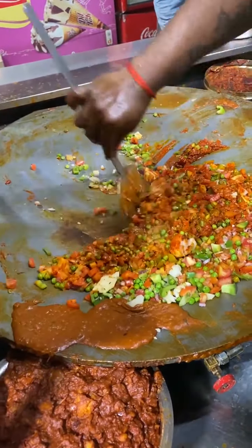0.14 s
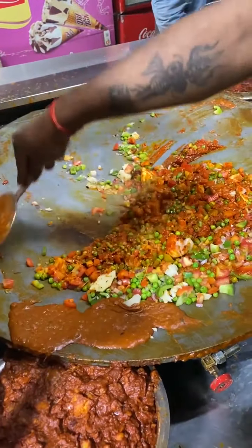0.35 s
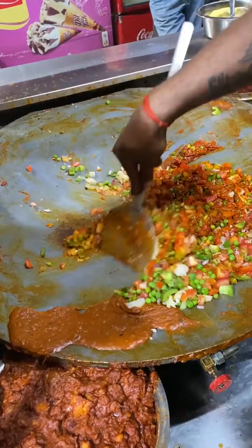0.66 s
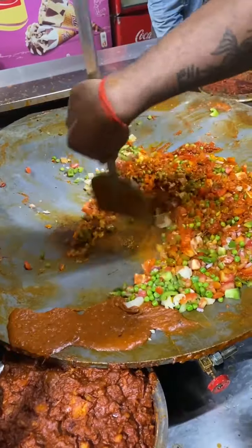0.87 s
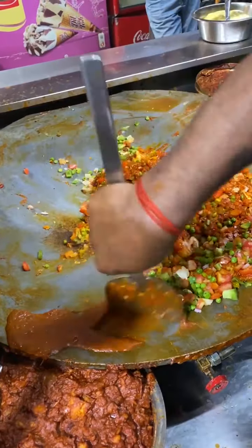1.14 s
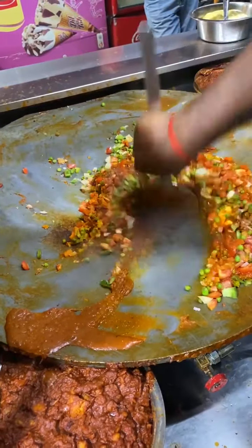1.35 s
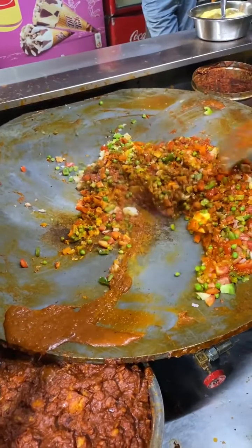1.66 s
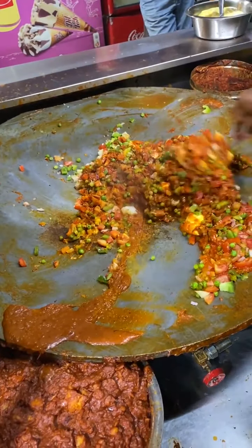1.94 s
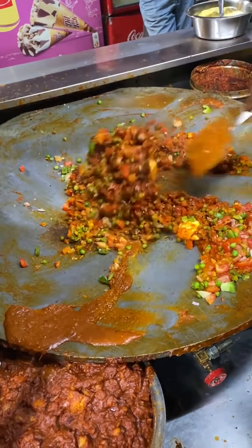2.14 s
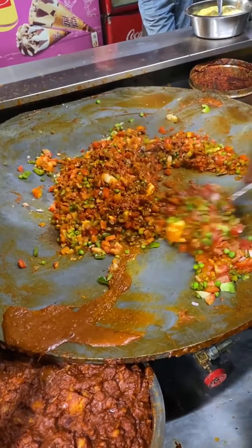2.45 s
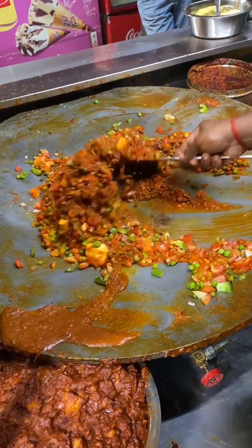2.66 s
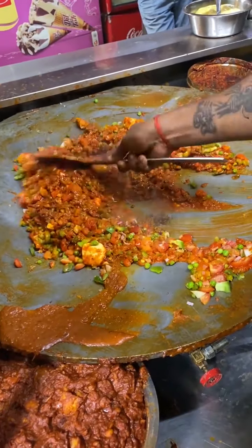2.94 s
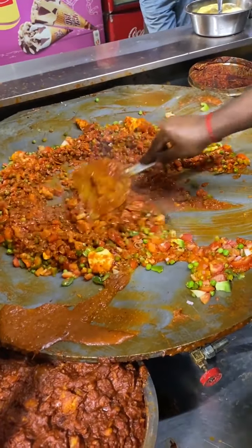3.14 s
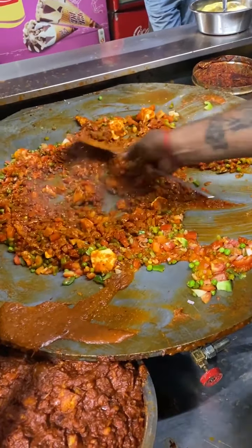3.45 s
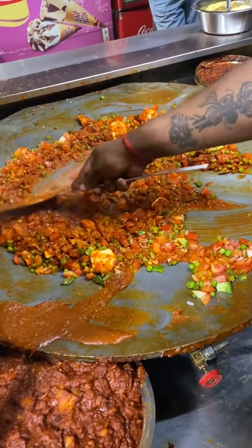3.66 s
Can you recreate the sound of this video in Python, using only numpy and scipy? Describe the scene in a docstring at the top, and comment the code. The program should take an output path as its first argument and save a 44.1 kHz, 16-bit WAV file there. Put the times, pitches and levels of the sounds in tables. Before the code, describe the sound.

Metal spatula blows on a wide iron plate, close up: a brief gritty scrape, a run of hard, damped clanks, then a faint scrape and last tap, with burner rumble and faint sizzle behind, short dull reflections.

```python
"""A flat steel spatula chops and scrapes food on a large round griddle over a roaring burner at a street stall.
The scene opens on a dying blow over filtered-noise roar and sizzle; light blows frame a short scrape of dense
clicks. From 0.67 s firmer blows follow, each a chatter of clicks exciting damped plate noise, while the landing
strikes the blade modes. After 3.3 s comes a fainter scrape, then one last blow; dull reflections follow every
stroke. Two close microphone ports hear it, and a gain control ducks loud moments and recovers slowly."""
import sys
import numpy as np
from scipy import signal
from scipy.fft import rfft, irfft, next_fast_len
from scipy.io import wavfile
from scipy.ndimage import uniform_filter1d

SR = 44100
rng = np.random.default_rng(int(sys.argv[2]) if len(sys.argv) > 2 else 0)


def output_pcm(signal):
    """Save a mono or channel-first signal as 16-bit PCM at the path in sys.argv[1].

    Samples are clipped to [-1, 1] before scaling.
    """
    pcm = np.clip(np.atleast_2d(signal).T, -1, 1) * 32767
    wavfile.write(sys.argv[1], SR, np.round(pcm).astype(np.int16))


def invert_db(level):
    """Linear amplitude ratio for a level in decibels (20 dB per decade), elementwise."""
    return 10 ** (np.asarray(level, dtype=float) / 20)


N = 167580


def rms_one(x):
    """Normalisation: scale to unit rms."""
    return x / np.sqrt(np.mean(x ** 2) + 1e-20)


def at_hz(points, hz):
    """Interpolation of a spectrum, linear on a log-frequency axis."""
    p = np.array(points, float)
    return np.interp(np.log(np.maximum(hz, 1)), np.log(np.maximum(p[:, 0], 1)), p[:, 1])


def drift(rate_hz):
    """Low-pass random process: noise through two equal poles at rate_hz, unit rms."""
    step = 40   # samples between computed points
    r = np.exp(-2 * np.pi * rate_hz * step / SR)
    white = rng.standard_normal(N // step + 2002)
    slow = signal.lfilter([1], [1, -2 * r, r * r], white)[2000:]
    return np.interp(np.arange(N) / step, np.arange(len(slow)), rms_one(slow))


def bands(low_hz, high_hz, count):
    """Constant-percentage filter bank: a list of (centre Hz, band-pass)."""
    edges = np.geomspace(low_hz, high_hz, count + 1)
    return [(np.sqrt(a * b), signal.butter(2, [a, b], "band", fs=SR, output="sos"))
            for a, b in zip(edges, edges[1:])]


def clicks(size, rate, spread_db):
    """Impulsive excitation: random contacts (rate per s) of uneven size and sign, unit rms."""
    happens, strength, sign = rng.random((size, 3)).T
    height = invert_db(-spread_db * np.log(strength + 0.0036))
    return rms_one((happens < rate / SR) * height * np.sign(sign - .5))


def mode(x, hz, t60):
    """Damped harmonic oscillator: a unit click starts a sine of height 1."""
    r, w = invert_db(-60 / (t60 * SR)), 2 * np.pi * hz / SR
    return signal.lfilter([0, np.sin(w)], [1, -2 * r * np.cos(w), r * r], x + 1e-18)


# interchannel correlation of the background noise: f/Hz, correlation of left with right
LIKENESS = [(60, 1), (150, 1), (380, 0.93), (950, 0.12), (1720, 1), (2400, 0.74), (4500, 0.45), (5200, 1),
            (7200, 1), (9300, .92), (10700, 0.18), (12700, 0.43), (15000, 0.57)]


def banded_noise(spectrum, bank, patchy_db):
    """Partial coherence: stereo noise, each band with its own level, flicker and correlation; unit rms."""
    out, white = 0, rng.standard_normal((2, 2, N + 4000))
    for k, (hz, sos) in enumerate(bank):
        # neighbouring bands take independent noise
        mid, side = signal.sosfilt(sos, white[k % 2])[:, -N:]
        alike = np.clip(at_hz(LIKENESS, hz), 0, 1)
        pair = np.sqrt(1 + alike) * mid + np.sqrt(1 - alike) * side * [[1], [-1]]
        out = out + invert_db(at_hz(spectrum, hz) + patchy_db * drift(6.5)) * pair
    return rms_one(out)


# strength of the flame: t/s, level/dB
FLAME_STRENGTH = [(0.0, -27.5), (0.43, -19.5), (0.53, -21.5), (0.66, -23.5), (1.27, -30), (1.46, -24.5),
                  (1.61, -27), (2.341, -24.5), (2.45, -25), (3.09, -29.5), (3.24, -24.5), (3.45, -29.5),
                  (3.68, -31.5), (3.8, -34.5)]
# relative spectral density of the roar: f/Hz, level/dB per Hz
ROAR_SPECTRUM = [(15, -51), (25, -6), (102, 2.5), (184, -4), (227, -7.5), (271, -16), (350, -7),
                 (389, -7.5), (452, -11.5), (517, -12.5), (900, -19.5), (1170, -63), (1980, -120)]
# resonances of the hollow under the plate: f/Hz, bandwidth/Hz, level over the unit-rms noise/dB
HOLLOW = [(110.9, 5.2, -2), (137.4, 27.6, -3), (228.3, 10, -2)]
# relative spectral density of the sizzling food and the street: f/Hz, level/dB per Hz
SIZZLE_SPECTRUM = [(290, -30), (500, -1), (827, -14.5), (1010, -10.5), (2100, -17), (3500, -19.5),
                   (5200, -26.5), (7300, -25), (9000, -30), (10700, -36.5), (15500, -41)]
SURGE_DB, SURGE_HZ = 2.5, 9   # rms and corner rate of the flame's flutter
SIZZLE_DB, SIZZLE_FOLLOWS = -36.5, 1   # level at mean flame; share of the flame's swing in dB


def burner():
    """Turbulent combustion noise excites cavity resonances; roar and sizzle follow the flame, only roar flutters."""
    flame_db = np.interp(np.arange(N) / SR, *np.transpose(FLAME_STRENGTH))
    roar = banded_noise(ROAR_SPECTRUM, bands(21.3, 936, count=14), patchy_db=2.0)
    for hz, width, db in HOLLOW:
        r = np.exp(-np.pi * width / SR)
        poles = [1, -2 * r * np.cos(2 * np.pi * hz / SR), r * r]
        hum = signal.lfilter([1, 0, -1], poles, rng.standard_normal(N + SR // 4))[-N:]
        roar = roar + invert_db(db) * rms_one(hum)
    sizzle = banded_noise(SIZZLE_SPECTRUM, bands(551, 15500, count=20), patchy_db=-0.4)
    sizzle_db = SIZZLE_DB + SIZZLE_FOLLOWS * (flame_db - flame_db.mean())
    return invert_db(flame_db + SURGE_DB * drift(SURGE_HZ)) * roar + invert_db(sizzle_db) * sizzle


PLATE_LOW_HZ = 554   # the heavy plate radiates little below
STALL_DB, STALL_T60_S, STALL_CUT_HZ = -17, 0.22, 3100


def stall(x):
    """Diffuse reflection from counter and roof: convolution with decaying dull noise, independent on each side."""
    t = np.arange(SR // 2) / SR
    dull = signal.butter(1, [PLATE_LOW_HZ, STALL_CUT_HZ], "band", fs=SR)
    noise = signal.lfilter(*dull, rng.standard_normal((2, len(t))))
    tail = noise * invert_db(-60 * t / STALL_T60_S) * (t > .006)   # first path 6 ms late
    tail = tail / np.sqrt((tail ** 2).sum(1, keepdims=True))
    return invert_db(STALL_DB) * signal.fftconvolve(x[None], tail, axes=1)[:, :N]


# modes of the blade before damping and chance: f/Hz, level/dB, T60/s
BLADE = [(900, -9, .12), (1450, -10, .1), (1650, -7, .12), (1790, -5, .2), (2110, -5, .13), (2430, -5, .15),
         (2630, -5, .16), (3120, -8, .14), (3330, -8, .14), (3680, -7, .13), (3915, -6, .12),
         (4540, -6, .1), (5100, -9, .08), (5320, -9, .07), (9600, -16, .1)]
MODE_SPREAD_DB, MODE_DETUNE = 3, .012   # grip and food change the blade at each blow; detuning is a ratio
HARDEST_DB, HARDEST_SHARE = 10, .6   # the mode struck hardest is louder and, pressed into the food, dies sooner
LONGEST_RING_S = .12


def blade(x, chance, share, hardest_hz=0):
    """Modal superposition: modes of chance strength and pitch, ring times scaled by share; one may be struck hardest."""
    rows = [(hz * (1 + MODE_DETUNE * b), db + MODE_SPREAD_DB * a, t60)
            for (hz, db, t60), (a, b) in zip(BLADE, chance)]
    if hardest_hz:
        k = np.argmin([abs(hz - hardest_hz) for hz, _, _ in BLADE])
        rows[k] = hardest_hz, BLADE[k][1] + HARDEST_DB, BLADE[k][2] * HARDEST_SHARE
    return sum(invert_db(db) * mode(x, hz, min(t60 * share, LONGEST_RING_S)) for hz, db, t60 in rows)


# pressure of the blade sliding on the plate, one table a stroke: t/s, level/dB
STROKES = [
    [(0.22, -66), (0.224, -22), (0.269, -19), (0.293, -18), (0.363, -18), (0.385, -10), (0.41, -12.5),
     (0.432, -23), (0.47, -50)],
    [(3.36, -35), (3.39, -31), (3.42, -30), (3.47, -27), (3.51, -28.5), (3.542, -28.5), (3.556, -47),
     (3.58, -70)],
]
# relative spectral density of the grit, one table a stroke: f/Hz, level/dB per Hz
SCRAPE_SPECTRA = [
    [(180, -38), (300, -20), (1110, -8.5), (2010, -17.5), (2580, -11), (3300, -18), (4100, -23.5),
     (6000, -20), (7500, -25), (9700, -34.5), (15700, -49)],
    [(410, -26), (700, -7.5), (2000, -2), (4210, -18.5), (5260, -2), (6310, -15), (8180, -22), (12900, -38),
     (15700, -45)],
]
# blade ring against the plate's grit, one value a stroke: level/dB
SCRAPE_RING_DB = [-15, -10]
SCRAPE_PER_S, SCRAPE_SPREAD_DB = 8000, 3.0
JUDDER_DB, JUDDER_HZ = 1.2, 59   # rms and corner rate


def scrape():
    """Friction excitation: dense grit under the juddering edge, coloured by the plate and ringing the blade."""
    t, out = np.arange(N) / SR, 0
    grit = clicks(N, SCRAPE_PER_S, SCRAPE_SPREAD_DB)
    judder = invert_db(JUDDER_DB * drift(JUDDER_HZ))
    no_chance = np.zeros((len(BLADE), 2))
    # neighbouring bands take opposite signs
    split = [(hz, signal.sosfilt(sos, grit) * (-1) ** k)
             for k, (hz, sos) in enumerate(bands(300, 16500, count=18))]
    for rows, colour, ring_db in zip(STROKES, SCRAPE_SPECTRA, SCRAPE_RING_DB):
        pressure = judder * invert_db(np.interp(t, *np.transpose(rows), left=-120, right=-120))
        plate = rms_one(sum(invert_db(at_hz(colour, hz)) * band for hz, band in split))
        ring = blade(pressure * grit, no_chance, .25) / blade(grit, no_chance, .25).std()
        out = out + pressure * plate + invert_db(ring_db) * ring
    return out


# blows and their bounces: t/s, level of the plate's first 20 ms/dB, factor on ring time left by the food,
# tilt/dB per octave, f of the mode struck hardest/Hz
BLOWS = [(-0.012, -15, 1.24, 3, 3285), (0.016, -24.5, 2.2, 0, 5400), (0.223, -23, 0.54, -2.5, 2540),
         (0.375, -13.5, 1.6, -5, 2696), (0.673, -3.5, 0.82, 1.4, 1664), (0.852, -6, 1.16, 2.5, 3957),
         (1.0707, -8.5, 0.64, 3, 5030), (1.083, -14.5, 1.2, 3, 2655), (1.2669, -4.5, 1.03, 0.6, 4450),
         (1.28, -8, 0.91, 0, 2056), (1.646, -3.5, 0.78, 2.6, 2460), (1.8445, -4.5, 0.59, 1.3, 1753),
         (2.06, 0, 0.84, 0.6, 3070), (2.071, -20.5, 2.9, 6, 5360), (2.278, -2, 0.94, 0.8, 1728),
         (2.294, -10.5, 0.47, -1.2, 4040), (2.588, -2.5, 0.91, 6, 2330), (2.597, -9.5, 0.23, -7.5, 2170),
         (2.8058, -13.5, 0.48, -3.5, 1450), (3.016, -2, 0.59, 1.7, 5180), (3.3136, -12, 0.9, 1.5, 1820),
         (3.792, -12, 0.68, -2, 2460)]
# relative spectral density of the plate before tilt and chance: f/Hz, level/dB per Hz
PLATE_SPECTRUM = [(260, -58), (450, -0.5), (662, 5), (1180, -1.5), (2050, 2), (2880, -1), (3880, 0),
                  (4180, -9.5), (5300, 0), (7600, -7), (9050, -18.5), (12400, -25.5), (15700, -40)]
# decay of the plate before the food's factor: f/Hz, T60/s
PLATE_T60 = [(400, 0.21), (1000, 0.046), (2500, 0.11), (5000, 0.077), (9000, 0.096), (15000, 0.023)]
BLOW_SPREAD_DB = 2   # each blow colours each band anew
CHATTER_PER_S, CHATTER_SPREAD_DB = 9000, 3
CHATTER_FADE_MS = 4.5   # time to 1/e of the force behind the thud
ATTACK_MS, LEAD_MS, LEAD_DB = .8, 6, -27   # the edge crunches through food just before it lands
CRACK_DB, CRACK_MS = 2, 2.2   # first contact stands out of the chatter
RING_DB = -5   # blade against the plate's noise
THUD_HZ, THUD_T60_S, THUD_DB = 238.3, 0.077, -16   # lowest mode of the plate


def blows():
    """Impact excitation: the edge crunches, lands and chatters; plate bands decay separately, the blade rings."""
    size, lead, bank = SR // 3, SR // 50, bands(400, 16500, count=18)
    t = (np.arange(size) - lead) / SR   # zero at landing
    early = slice(lead, 2 * lead)   # first 20 ms, the reference for levels
    out = np.zeros(N + size + 2 * lead)
    low_cut = signal.butter(4, PLATE_LOW_HZ, "high", fs=SR, output="sos")
    crunch = invert_db(LEAD_DB) * (t < 0) * np.clip(1 + 1000 * t / LEAD_MS, 0, 1) ** .5
    rise = np.clip(1000 * t / ATTACK_MS, 0, 1) + crunch
    crack = (invert_db(CRACK_DB) - 1) * (t > 0) * np.exp(-1000 * np.abs(t) / CRACK_MS)

    def dying(t60):
        """Exponential decay with the rise and the crack of first contact."""
        return rise * (invert_db(-60 * np.maximum(t, 0) / t60) + crack)

    for s, db, share, tilt_db, hardest_hz in BLOWS:
        grit = [clicks(size, CHATTER_PER_S, CHATTER_SPREAD_DB) for _ in range(2)]
        colour_db = BLOW_SPREAD_DB * rng.standard_normal(len(bank))
        plate = 0
        for k, (hz, sos) in enumerate(bank):
            fading = grit[k % 2] * dying(share * at_hz(PLATE_T60, hz))
            band = signal.sosfilt(sos, fading + 1e-18)
            band_db = at_hz(PLATE_SPECTRUM, hz) + tilt_db * np.log2(hz / 2000) + colour_db[k]
            # sqrt(hz): bandwidth grows with frequency
            plate = plate + invert_db(band_db) * np.sqrt(hz) * band / band[early].std()
        chance = rng.standard_normal((len(BLADE), 2))
        ring = blade(1. * (t == 0), chance, share, hardest_hz)
        force = grit[0] * dying(CHATTER_FADE_MS * np.log(1000) / 1000)   # 1/e time as T60
        thud = mode(np.diff(np.abs(force), prepend=0), THUD_HZ, THUD_T60_S)
        parts = [(0, signal.sosfilt(low_cut, plate)), (RING_DB, ring), (THUD_DB, thud)]
        i = int(s * SR) + lead
        out[i:i + size] += sum(invert_db(db + part_db) * part / part[early].std() for part_db, part in parts)
    return out[2 * lead:2 * lead + N]


def scene():
    """Linear superposition: the spatula near the microphones, its reflections, and the burner."""
    spatula = blows() + scrape()
    return spatula + stall(spatula) + burner()


# phase between the ports: f/Hz, phase by which left leads/rad
PORT_PHASE = [(1700, 0.05), (2300, 0.75), (3500, 0.85), (5300, 0.35), (5860, 1.4), (6450, 2.75),
              (7300, 3.14), (7950, 3.5), (8550, 6.28), (9400, 6.28), (10500, 6.75), (12800, 6.5),
              (13450, 7.5), (14200, 8.8), (14800, 9.42)]
# level between the ports: f/Hz, left over right/dB
PORT_BALANCE = [(60, 0.0), (110, 0.0), (200, -0.5), (380, -1.5), (700, -1.5), (1290, -0.5), (2380, -0.5),
                (4400, -0.5), (8120, 0.0), (15000, 0.0)]


def ports(x):
    """Interchannel difference: level and phase split evenly between the ports; some frequencies are opposed."""
    size = next_fast_len(N + 2000)
    hz = np.arange(size // 2 + 1) * SR / size
    half = invert_db(at_hz(PORT_BALANCE, hz) / 2) * np.exp(.5j * at_hz(PORT_PHASE, hz))
    return irfft(rfft(x, size) * np.array([half, 1 / half]), size)[:, :N]


def low_pass(x):
    """Removes everything above the highest recorded frequency."""
    return signal.sosfilt(signal.butter(12, 15830, fs=SR, output="sos"), x)


LOW_CUT_HZ, TOP_CUT_HZ = 42, 15800
DUCK_FROM_DB, DUCK_SHARE, DUCK_ATTACK_S = -26.5, 0.41, 0.0013   # share of the held excess taken off
EXCESS_FALL_DB_PER_S = 37.5   # fall of the held excess, before the share
OVERLOAD_LIMIT = 1.3   # amplitude that the soft overload approaches


def record(dry):
    """Dynamic compression: two ports, band limits, ducking on loud moments with slow recovery, soft overload."""
    x = signal.sosfilt(signal.butter(3, LOW_CUT_HZ, "high", fs=SR, output="sos"), ports(dry))
    x = signal.sosfilt(signal.cheby2(8, 40, TOP_CUT_HZ, fs=SR, output="sos"), x)
    level_db = 10 * np.log10(np.maximum(uniform_filter1d((x ** 2).mean(0), size=220), 1e-12))
    excess_db = np.maximum(level_db - DUCK_FROM_DB, 0)
    # peak hold that falls at a steady rate
    fall = EXCESS_FALL_DB_PER_S * np.arange(N) / SR
    held_db = np.maximum.accumulate(excess_db + fall) - fall
    r = np.exp(-1 / (DUCK_ATTACK_S * SR))
    x = x * invert_db(-DUCK_SHARE * signal.lfilter([1 - r], [1, -r], held_db))
    mix = OVERLOAD_LIMIT * np.tanh(x / OVERLOAD_LIMIT)
    return low_pass(mix)


dry = scene()
out = record(dry)
output_pcm(out)
```